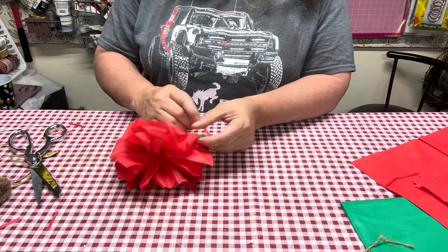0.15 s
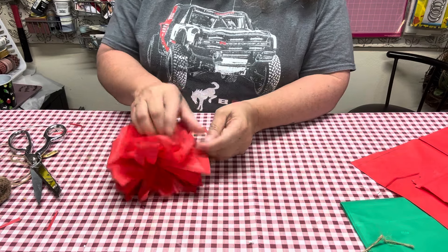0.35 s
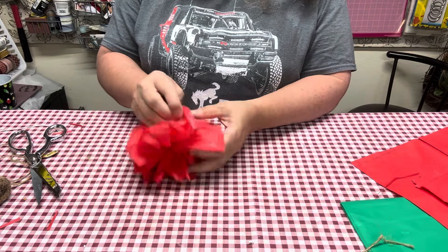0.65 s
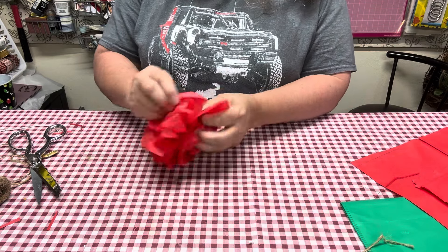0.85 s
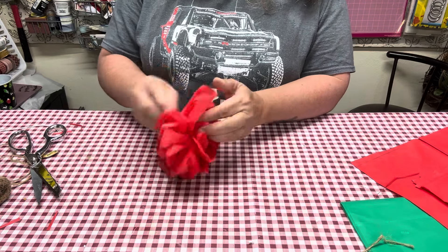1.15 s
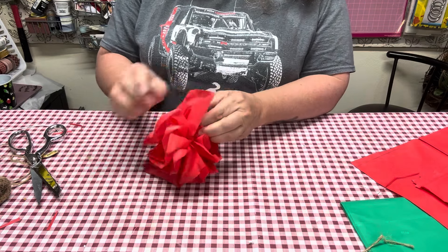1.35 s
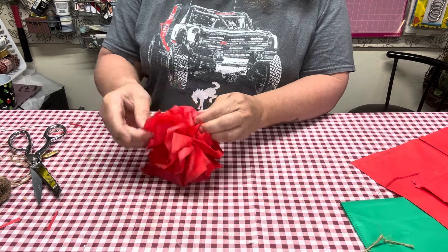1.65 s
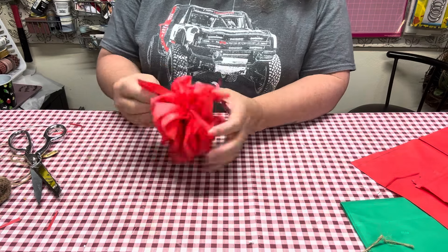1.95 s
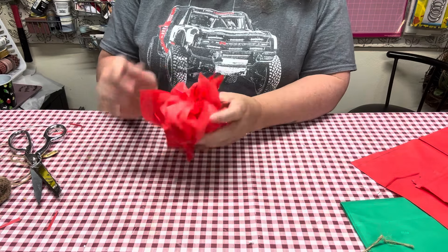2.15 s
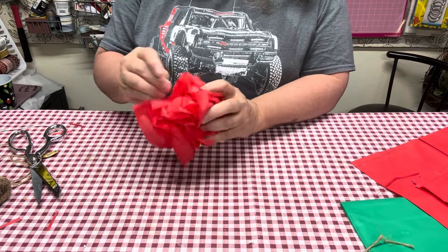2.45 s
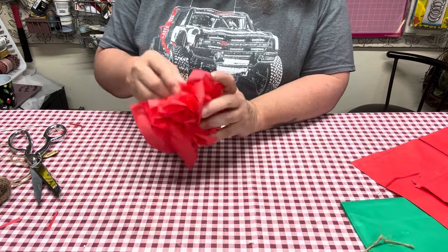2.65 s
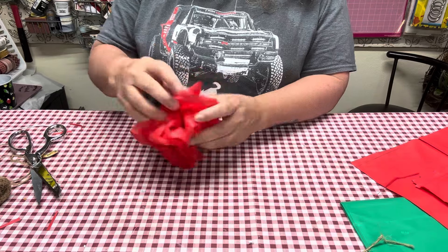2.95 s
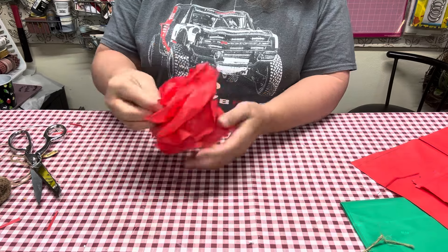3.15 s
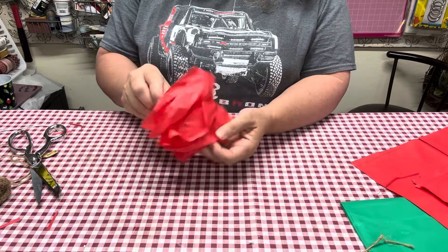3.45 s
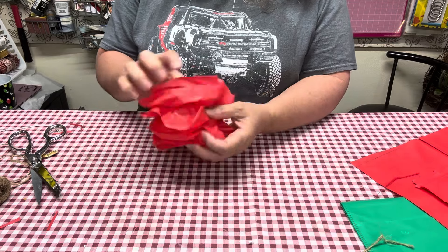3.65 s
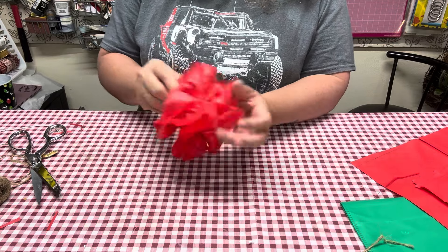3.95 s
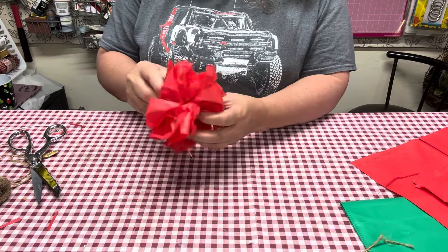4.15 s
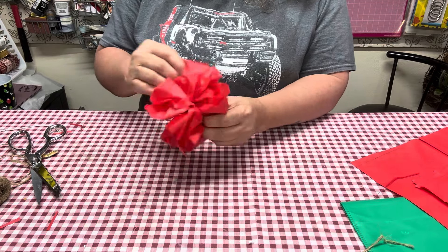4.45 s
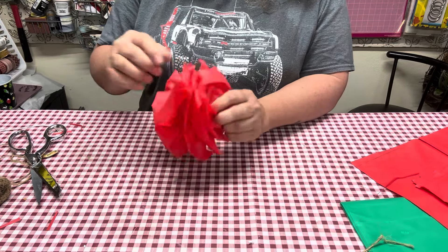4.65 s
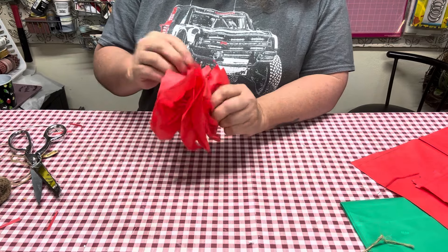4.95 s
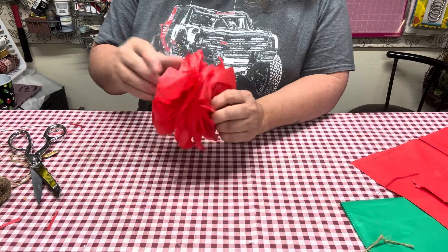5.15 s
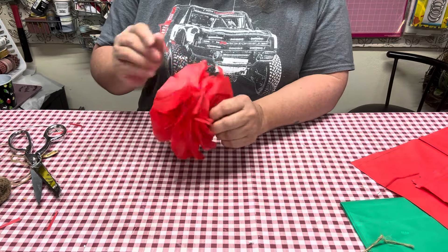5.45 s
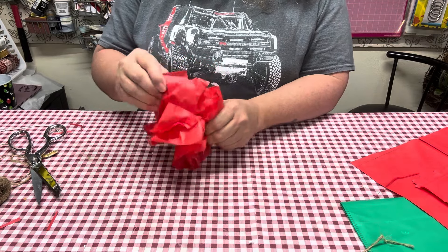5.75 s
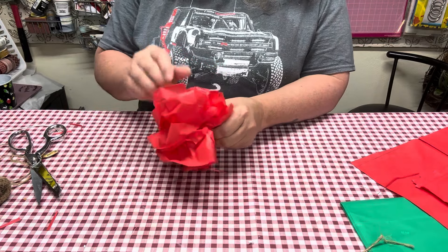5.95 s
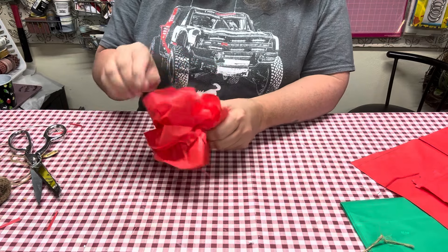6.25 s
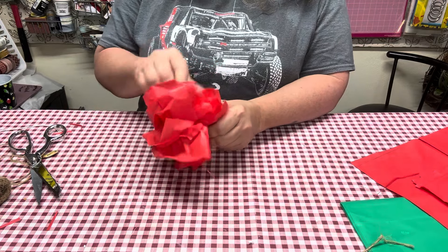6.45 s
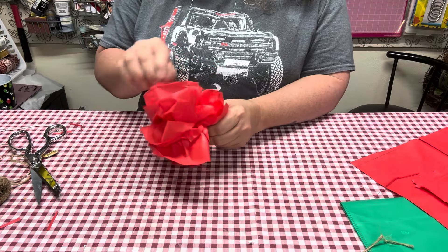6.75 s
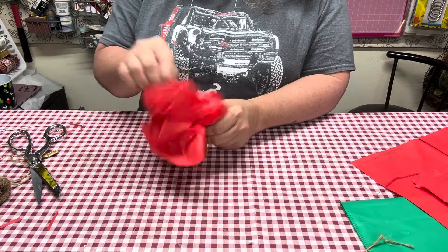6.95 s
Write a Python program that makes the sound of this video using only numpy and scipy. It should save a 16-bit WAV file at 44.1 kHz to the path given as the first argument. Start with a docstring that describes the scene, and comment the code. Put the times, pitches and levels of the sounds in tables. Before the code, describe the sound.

Two hands fluff a flower made of thin plastic sheeting. It rustles in short, uneven strokes, a light hiss mixed with crackles, sharp little snaps and an occasional hollow pop as a petal flips. A hand softly bumps the table near the start. The crinkling continues throughout, with more small gaps toward the end. It sounds close, in a small room with a faint low hum.

```python
"""A flower made of thin plastic sheeting rustles as two hands fluff its petals at a craft table.
Each stroke slides sheet over sheet (a dense hiss of tiny slips), buckles creases (crackles and sharp
snaps) and flexes the petals (a soft low flutter). Now and then a petal pops over or a hand knocks the
table. The small room hums faintly. Parts of the treble sound wide between left and right."""
import sys
import numpy as np
from scipy import signal
from scipy.fft import rfft, irfft, next_fast_len
from scipy.io import wavfile
from scipy.ndimage import uniform_filter1d

SR = 44100
rng = np.random.default_rng(int(sys.argv[2]) if len(sys.argv) > 2 else 0)


def waveform_to_disk(signal):
    """Save audio, clipped to [-1, 1], as 16-bit WAV at the path in sys.argv[1]."""
    frames = np.transpose(np.atleast_2d(signal))
    scaled = np.clip(frames, -1, 1) * 32767
    samples = np.round(scaled).astype(np.int16)
    wavfile.write(sys.argv[1], SR, samples)


N = 313551
TIME = np.arange(N) / SR

# A hand strokes or squeezes the petals. Each row: start in seconds, length in seconds, peak level in dB,
# place of the hardest push from 0 to 1, swell up to it in dB, extra hiss in dB, extra flutter in dB.
HAND_STROKES = [(0.0, 0.11, -54.5, 0.3, 4, 6, -2.5), (0.133, 0.12, -56.5, 0.32, 8, 8.5, -4),
                (0.293, 0.37, -51, 0.4, 1.5, 2.5, 3), (0.545, 0.32, -42.5, 0.4, 3.5, 3.0, 1.0),
                (0.758, 0.096, -40, 0.48, 6.5, 1, 2), (0.854, 0.077, -40, 0.44, 14, 4.5, 4),
                (0.936, 0.24, -41.5, 0.88, 12.5, 2.5, -1.5), (1.148, 0.21, -45, 0.23, 11.5, 3.5, 0.5),
                (1.386, 0.079, -49, 0.56, 10.5, 3, -7), (1.448, 0.13, -43.5, 0.23, 5, 1, 0),
                (1.553, 0.12, -35, 0.48, 19.5, 2.0, 1.5), (1.681, 0.085, -54.5, 0.3, 1.5, 2.5, 5),
                (1.774, 0.21, -40.5, 0.68, 9, 2.5, 0.0), (1.982, 0.13, -39.5, 0.66, 8.5, 4.0, -2),
                (2.129, 0.12, -60, 0.5, 0.5, 7.5, 5), (2.272, 0.17, -43, 0.41, 4.5, 0.5, -1),
                (2.534, 0.09, -45.5, 1, 14, 6, 5), (2.614, 0.17, -43.5, 0.1, 2.5, 1.5, 1),
                (2.827, 0.14, -49.5, 0.9, 10, 5.5, 6), (2.922, 0.19, -36, 0.29, 15, 4, -6.5),
                (3.071, 0.094, -38.5, 0.25, 13, 5.5, 2), (3.182, 0.19, -39, 0.27, 6, 2, 0.5),
                (3.373, 0.2, -44, 0.29, 5.5, 4.5, 1.5), (3.571, 0.16, -42.5, 0.47, 5.5, 4.5, -2),
                (3.708, 0.141, -34, 0.47, 5.5, 4.5, -3), (3.858, 0.16, -41.5, 0.7, 4.5, 7.5, 2.5),
                (4.015, 0.23, -44, 0.12, 2.5, 3.5, 0.5), (4.257, 0.23, -39, 0.48, 15, 1.5, 0.0),
                (4.479, 0.19, -45, 0.26, 15, 4.5, -1.5), (4.707, 0.21, -46.5, 0.33, 4.5, 1.5, 0.5),
                (4.933, 0.081, -42.5, 0.42, 13, 3, 1.5), (5.023, 0.15, -60.5, 0.9, 13, 5.5, 10.5),
                (5.16, 0.18, -47, 0.41, 5.5, 1.5, 2.5), (5.296, 0.097, -45.5, 0.94, 8, 2, 3),
                (5.603, 0.094, -42, 0.7, 6, -2, 0.5), (5.73, 0.078, -47, 0.9, 6.5, 5, -1.0),
                (5.832, 0.09, -61.0, 0.46, 12, 1.5, 0.5), (6.007, 0.21, -42.5, 0.59, 11.5, -1, -3),
                (6.216, 0.072, -46.5, 0.48, 13.5, 0, -2.5), (6.314, 0.15, -69, 0.2, 20, -7, -12),
                (6.432, 0.12, -42.5, 0.54, 18, 0.5, -3.0), (6.533, 0.14, -43.5, 0.44, 6, -0.5, -5),
                (6.699, 0.07, -51.5, 0.44, 3, 1.0, -3.0), (6.846, 0.225, -38, 0.48, 13, 1.5, -1)]
# The rustle's overall tone, with a dip near 11.5 kHz. Each row: frequency in Hz, strength there in dB.
RUSTLE_SPECTRUM = [(110,-6.5),(200,-10.5),(350,-2),(550,1),(850,-3.5),(1400,-6.5),(2200,-6),(3000,-2.5),(4100,-5),(6000,-7.5),(8000,-6),(11500,-14),(14000,-5.5),(16000,-6)]
# The tone of the quiet room. Each row: frequency in Hz, strength there in dB.
ROOM_SPECTRUM = [(20,-23),(32,-19),(45,3),(58,4.5),(78,-4.5),(110,-1.5),(160,-20),(300,-38),(600,-37.5),(1200,-46),(3000,-47),(8000,-47),(16000,-52)]
# The room's rumble rises and falls. Each row: time in seconds, level in dB before a boost.
RUMBLE_LEVELS = [(0.0,-63.5),(0.7,-63.5),(1.2,-68),(1.9,-63),(2.6,-65.5),(4.0,-62.5),(4.7,-70),(5.7,-65),(6.4,-70.5),(7.11,-61.5)]
# Faint whirring in the room. Each row: pitch in Hz, width in Hz, level in dB.
WHIRR_BANDS = [(1144,54,-82),(2230,630,-99),(3400,180,-90),(4970,61,-89)]
# Hum from the mains power. Each row: pitch in Hz, level in dB.
HUM_TONES = [(60,-75.5),(120.5,-73.5)]
# Creases snap through. Each row: start in seconds, relative level in dB, pitch in Hz.
CREASE_SNAPS = [(0.329, -45, 5100), (0.382, -43, 5700), (0.4367, -41, 7700), (0.4746, -40.5, 2900),
                (0.516, -47, 2000), (0.6264, -41, 6000), (0.7945, -38, 3600), (0.9574, -47, 7700),
                (1.278, -39.5, 3200), (1.474, -42, 6900), (1.5733, -34, 2500), (1.604, -37, 3500),
                (1.6116, -32, 3900), (1.7946, -41, 2800), (1.8347, -38, 11600), (1.912, -29, 7500),
                (1.9538, -34, 1700), (2.283, -41.5, 4600), (2.982, -36, 6700), (3.103, -39, 9500),
                (3.156, -42, 8900), (3.65, -36, 7700), (4.287, -41, 10000), (5.14, -45.5, 7500),
                (5.174, -44, 8400), (5.217, -43, 2600), (5.3126, -42, 3300), (5.37, -41, 5000),
                (5.6205, -35, 3600), (5.745, -40, 4500), (6.022, -45, 8700), (6.0857, -39, 4400),
                (6.3935, -57, 2800), (6.723, -47, 9500)]
# A finger pushes a petal over. Each row: start in seconds, relative level in dB, pitch in Hz.
PETAL_POPS = [(0.553, -35, 300), (0.627, -31, 447), (0.81, -35, 477), (0.856, -34.5, 600),
              (0.891, -43.5, 555), (1.505, -36, 572), (1.617, -27.5, 445), (1.913, -38, 410),
              (1.954, -36.5, 434), (3.002, -30, 550), (3.229, -37, 604), (3.833, -36, 590),
              (3.901, -34, 624), (4.353, -38.5, 570), (5.216, -35, 580), (5.384, -36.5, 483),
              (5.621, -31.5, 517), (6.94, -47, 460)]
# A hand knocks the table. Each row: start in seconds, strength in dB.
HAND_KNOCKS = [(0.555,-36.5),(0.576,-41),(1.617,-49),(7.006,-57),(7.072,-48)]
# The table's own notes. Each row: pitch in Hz, relative level in dB, seconds to fade by 60 dB.
TABLE_NOTES = [(73,-12,0.16),(127,-34,0.094),(203,0.5,0.051)]
# How left and right compare; some treble bands swing opposite ways and sound wide. Each row:
# frequency in Hz, the left's lead in radians, likeness from 0 to 1, left minus right level in dB.
STEREO_IMAGE = [(50,0.05,0.94,0.4),(250,-0.1,0.8,0.3),(2000,-0.3,0.78,-0.7),(3000,-1.0,0.67,-0.2),(4500,-1.3,0.36,-2.8),(6100,-1.7,0.36,-2.4),(7650,0,0.98,0),(8200,0,0.98,0),(9000,1.4,0.6,0.5),(9750,3.1,0.99,0),(10900,3.16,0.995,0),(11400,4.3,0.55,0),(11850,6.2,0.92,0),(13000,6.3,0.99,0),(13900,7.9,0.76,0),(14600,9.4,0.98,0)]


def from_db(db):
    """Turn decibels into a number to multiply a sound by."""
    return 10 ** (np.asarray(db) / 20)


def rms_one(x):
    """Scale a sound so its average level (rms) is 1."""
    return x / np.sqrt(np.mean(x ** 2) + 1e-20)


def at_hz(spectrum, hz):
    """Look up a spectrum's dB at any frequency, sliding between its rows."""
    row_hz, db = np.transpose(spectrum)
    return np.interp(np.log(hz + 1e-6), np.log(row_hz), db)


def drift(per_s):
    """A random wobble of about size 1 that changes course per_s times a second."""
    points = rng.standard_normal(8192)
    return 1.22 * np.interp(TIME * per_s, np.arange(len(points)), points)


def band(x, low_hz, high_hz):
    """Keep the part of a sound between two frequencies."""
    sos = signal.butter(2, [low_hz, min(high_hz, SR * .45)], "band", fs=SR, output="sos")
    return signal.sosfilt(sos, x + 1e-18)


def fade(x, decay_s):
    """Give every click a fading tail that starts at the click's height."""
    return signal.lfilter([1], [1, -np.exp(-1 / (decay_s * SR))], x + 1e-18)


def add(out, start_s, sound):
    """Mix a short sound in at the given time."""
    i = max(round(start_s * SR), 0)
    out[:, i:i + sound.shape[1]] += sound[:, :N - i]


def hand_strokes(grip_share=.09, settle_s=.023, held_db=-81):
    """Fingers grip, push, ease and let go; the sheets settle. Gives effort, hiss and flutter in dB."""
    mix, age = np.zeros((3, N)), TIME[:SR]
    for start, length, db, push, swell_db, hiss_db, flutter_db in HAND_STROKES:
        push_s = np.clip(push, .05, .95) * length
        press_db = np.interp(age, [0, push_s, length], [-swell_db, 0, -swell_db])
        grip = np.clip(age / (grip_share * length), 0, 1)   # quick strokes start sharply
        settle = np.exp(-np.maximum(age - length, 0) / settle_s)
        stroke_power = (from_db(db + press_db) * grip * settle) ** 2
        add(mix, start, np.outer([1, hiss_db, flutter_db], stroke_power))
    power = mix[0] + from_db(held_db) ** 2   # even just held, the flower stirs faintly
    return 10 * np.log10(power), mix[1] / power, mix[2] / power


def rustle(crackle_share=.37, shortest_ring_s=.0009, ring_cycles=.3, patchy_db=1.82, judder_db=.93):
    """Sliding sheets hiss; creases buckle at random, each a tiny burst around its own pitch."""
    effort_db, hiss_db, flutter_db = hand_strokes()
    edges_hz = np.geomspace(110, 17000, 19)
    creases_per_s = 1300 * from_db(.4 * (effort_db + 50))   # harder strokes buckle more creases
    starts = np.flatnonzero(rng.random(N) < creases_per_s / SR)
    size = from_db(3 * np.minimum(rng.exponential(1, N), 4))[starts]
    pitch = np.exp(rng.uniform(np.log(edges_hz[0] / 2), np.log(edges_hz[-1] * 2), N))[starts]
    stick_slip_db = judder_db * drift(70)   # the fingers stick and slip
    noise = rng.standard_normal((2, 2, N))
    out, upper_power = 0, 0
    for k, (low, high) in enumerate(zip(edges_hz, edges_hz[1:])):
        hz = np.sqrt(low * high)
        energy = np.zeros(N)
        energy[starts] = size ** 2 * np.exp(-.5 * np.log2(pitch / hz) ** 2)   # an octave either way
        ring_s = shortest_ring_s + ring_cycles / hz   # big, low folds ring longer
        crackle = fade(energy, ring_s) / creases_per_s
        texture = np.sqrt(1 - crackle_share + crackle_share * crackle / crackle.mean())
        bright = np.clip(np.log2(hz / 3800), 0, 1)   # light sliding sounds bright
        dull = np.clip(np.log2(1400 / hz), 0, 1)   # bending whole petals sounds dull
        gain = from_db(at_hz(RUSTLE_SPECTRUM, hz) + bright * hiss_db + dull * flutter_db)
        gain = gain * np.sqrt(high - low)   # wider bands carry more sound
        upper_power += gain ** 2 * (hz > 1000)   # the upper bands set the overall level
        flicker = from_db(patchy_db * drift(25))
        out += gain * texture * flicker * rms_one(band(noise[k % 2], low, high))
    return out / np.sqrt(upper_power) * from_db(effort_db + stick_slip_db)


def petal_hollows(x, width_share=.056, ring_db=-7.5, come_go_db=8):
    """Hollows between the petals ring; each comes and goes as the flower changes shape."""
    out = x.copy()
    for hz in np.geomspace(1000, 5400, 13):
        openness = np.minimum(drift(per_s=7), 1.5) - 1
        ring = signal.lfilter(*signal.iirpeak(hz, 1 / width_share, fs=SR), x + 1e-18)
        out += from_db(ring_db + come_go_db * openness) * ring
    return out


def room_tone(rumble_boost_db=4, air_db=-73.5):
    """A low rumble that swells and sinks, faint steady air, a thin whirr and mains hum."""
    hz = np.arange(N // 2 + 1) * SR / N
    spectrum = rfft(rng.standard_normal((2, N))) * from_db(at_hz(ROOM_SPECTRUM, hz))
    low = hz < 200
    rumble_db = np.interp(TIME, *np.transpose(RUMBLE_LEVELS)) + rumble_boost_db
    out = rms_one(irfft(spectrum * low, N)) * from_db(rumble_db)
    out += rms_one(irfft(spectrum * ~low, N)) * from_db(air_db)
    for pitch, width, db in WHIRR_BANDS:
        whirr = band(rng.standard_normal((2, N)), pitch - width / 2, pitch + width / 2)
        out += from_db(db) * rms_one(whirr)
    for pitch, db in HUM_TONES:
        out[0] += from_db(db) * np.sqrt(2) * np.sin(2 * np.pi * (pitch * TIME + rng.random()))
    return out


def crease_snaps(crack_s=.00022, cycles=3.6, shiver_s=.0055, shiver_db=-16, spread=1.71, gain_db=-.5):
    """A crease flips with a crack, longer for a big fold; then the petal around it shivers."""
    out, t = np.zeros((2, N)), TIME[:2048]
    for start, db, hz in CREASE_SNAPS:
        crack = np.exp(-t / (crack_s + cycles / hz))
        shiver = from_db(shiver_db) * np.exp(-t / shiver_s)
        burst = band(rng.standard_normal((2, len(t))) * (crack + shiver), hz / spread, hz * spread)
        power = uniform_filter1d(burst ** 2, size=55, mode="constant")
        loudest = np.sqrt(power.max(axis=1, keepdims=True))
        add(out, start, from_db(db + gain_db) * burst / loudest)
    return out


def petal_pops(fade_cycles=.46, gain_db=-3.5):
    """A whole petal flips over: a hollow pulse of two or three swings."""
    out, t = np.zeros((2, N)), TIME[:3000]
    for start, db, hz in PETAL_POPS:
        age = t * hz / fade_cycles
        swell = (age * np.e / 2) ** 2 * np.exp(-age)   # rises to 1, then dies away
        swing = np.sin(2 * np.pi * (hz * t + rng.random((2, 1))))
        add(out, start, from_db(db + gain_db) * swell * swing)
    return out


def table_knocks():
    """Each knock of a hand sets the table's low notes ringing."""
    out, t = np.zeros((2, N)), TIME[:8000]
    ring = sum(from_db(db - 60 * t / fade_s) * np.sin(2 * np.pi * hz * t)
               for hz, db, fade_s in TABLE_NOTES)
    for start, db in HAND_KNOCKS:
        add(out[:1], start, from_db(db) * ring[None])
    return out


def room_echo(x, echo_db=-19, fade_s=.1, top_hz=7000):
    """The cluttered walls add a short, dull echo."""
    t = TIME[:SR // 2]
    tail = band(rng.standard_normal((2, len(t))), 120, top_hz)
    tail *= from_db(-60 * t / fade_s) * (t > .005)
    tail /= np.sqrt(np.sum(tail ** 2, axis=1, keepdims=True))
    return x + from_db(echo_db) * signal.fftconvolve(x, tail, axes=1)[:, :N]


def stereo_spread(x):
    """Make left and right: row 0 of x goes to both sides alike, row 1 with opposite signs."""
    size = next_fast_len(N + 2048)
    shared, apart = rfft(x, size)
    hz = np.arange(len(shared)) * SR / size
    row_hz, *columns = np.transpose(STEREO_IMAGE)
    lead, alike, balance_db = [np.interp(hz, row_hz, column) for column in columns]
    side = np.array([[1], [-1]])   # left, right
    pair = np.sqrt((1 + alike) / 2) * shared + side * np.sqrt((1 - alike) / 2) * apart
    pair *= from_db(side * balance_db / 2)   # one side is louder
    pair *= np.exp(side * 1j * lead / 2)   # one side swings ahead
    return irfft(pair, size)[:, :N]


def scene(rustle_gain_db=-.5):
    """Hands fluff the flower over its table in the quiet room."""
    sheets = from_db(rustle_gain_db) * petal_hollows(rustle())
    handling = sheets + crease_snaps() + petal_pops() + table_knocks()
    return stereo_spread(room_echo(handling) + room_tone())


def record(dry, cutoff_hz=15800):
    """Cut away the very highest treble steeply."""
    return signal.sosfilt(signal.ellip(10, .1, 80, cutoff_hz, fs=SR, output="sos"), dry)


dry = scene()
out = record(dry)
waveform_to_disk(out)
```